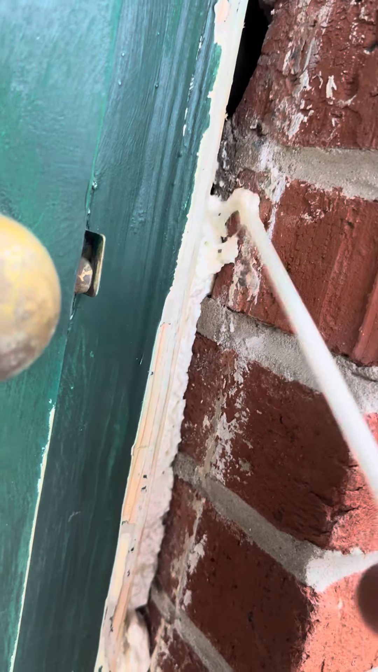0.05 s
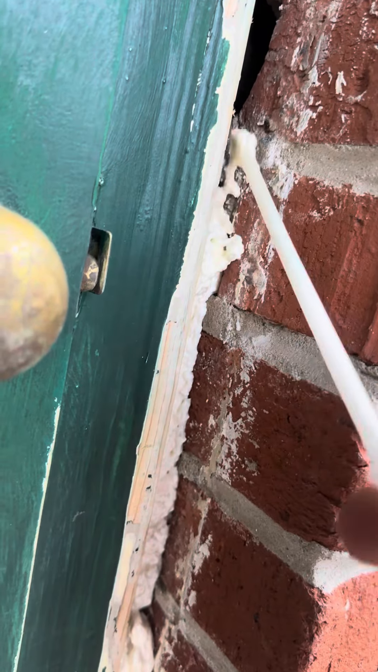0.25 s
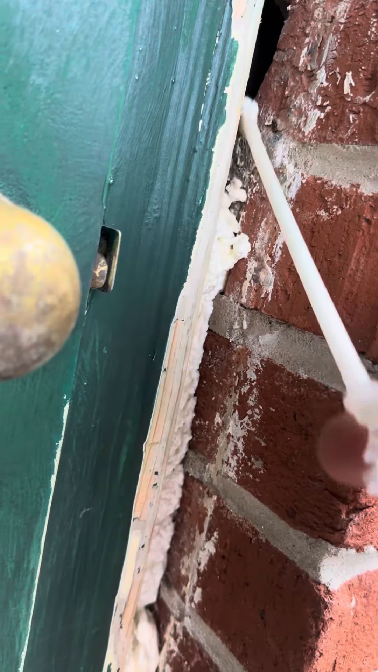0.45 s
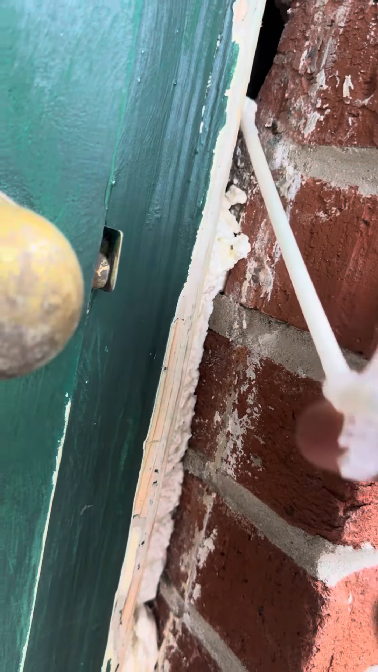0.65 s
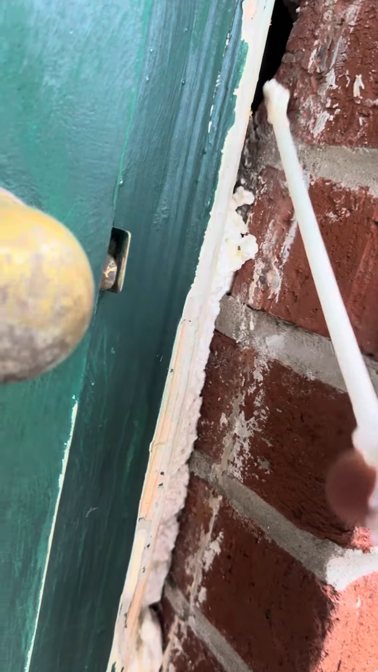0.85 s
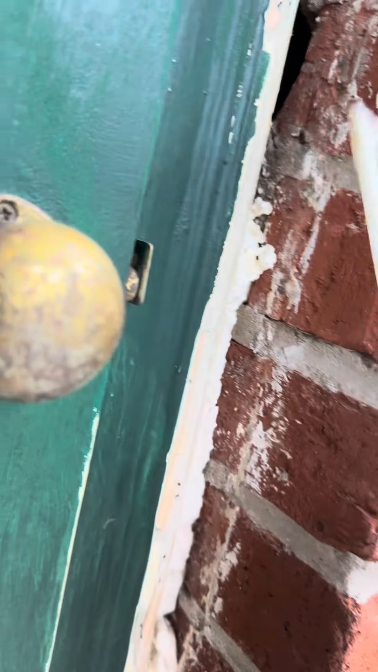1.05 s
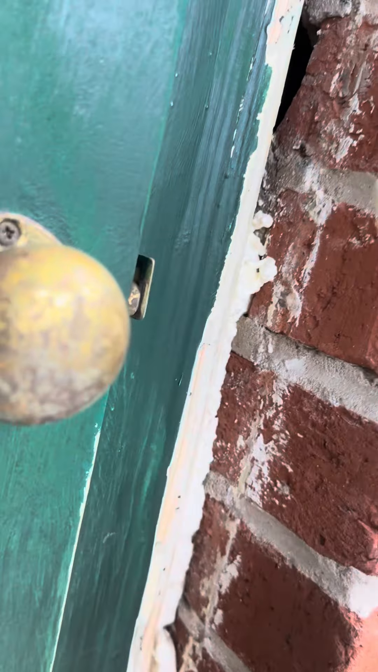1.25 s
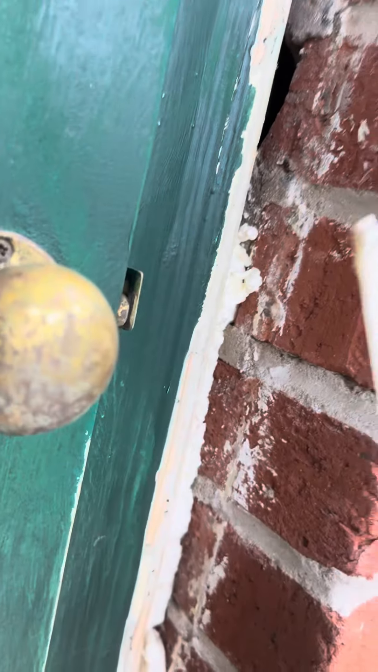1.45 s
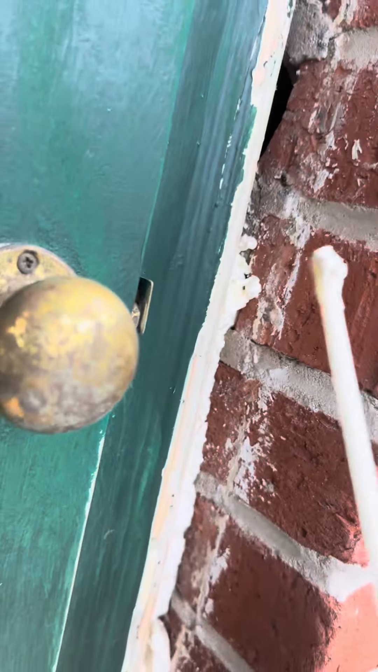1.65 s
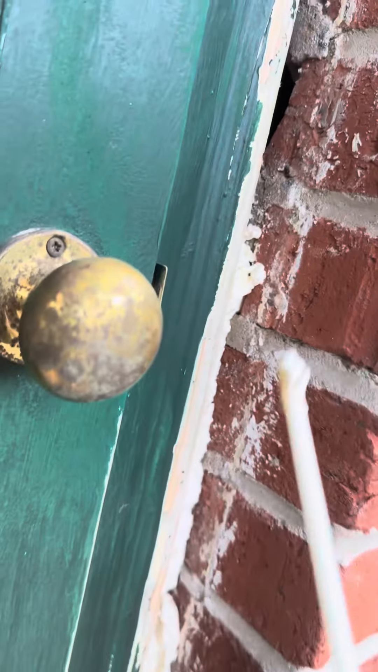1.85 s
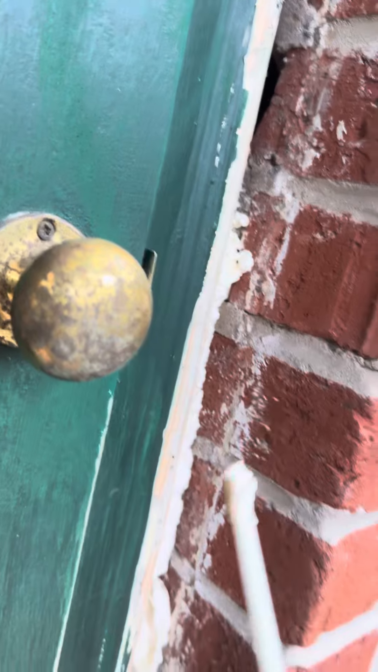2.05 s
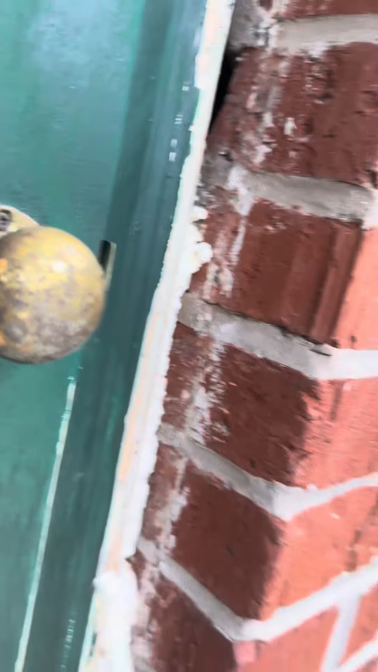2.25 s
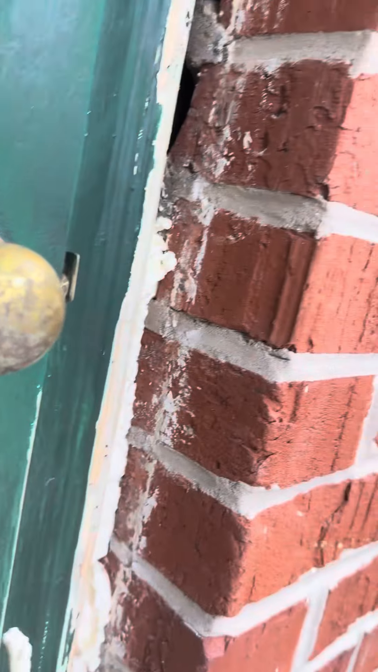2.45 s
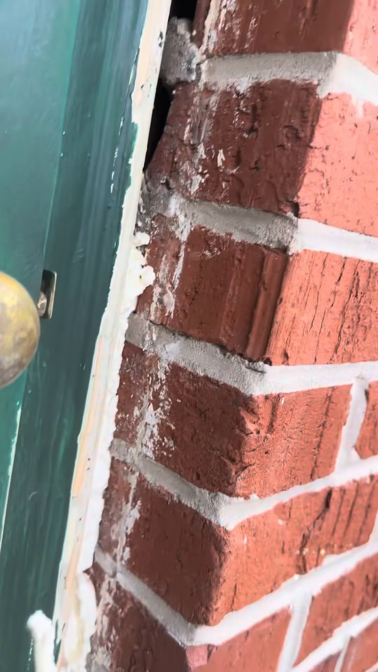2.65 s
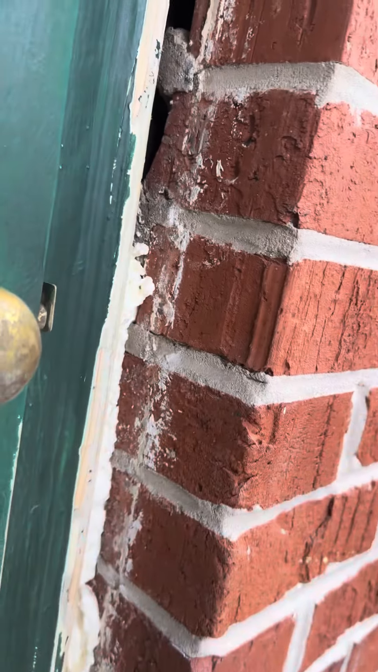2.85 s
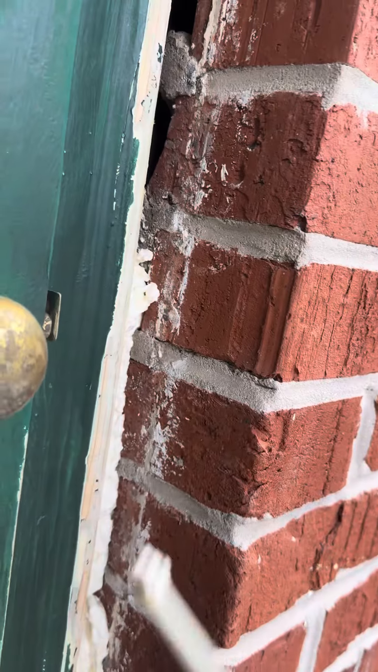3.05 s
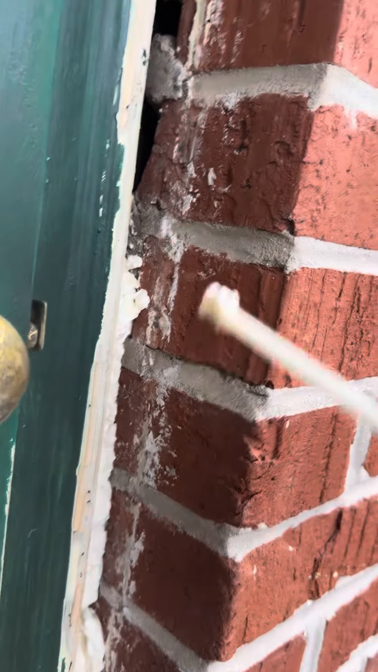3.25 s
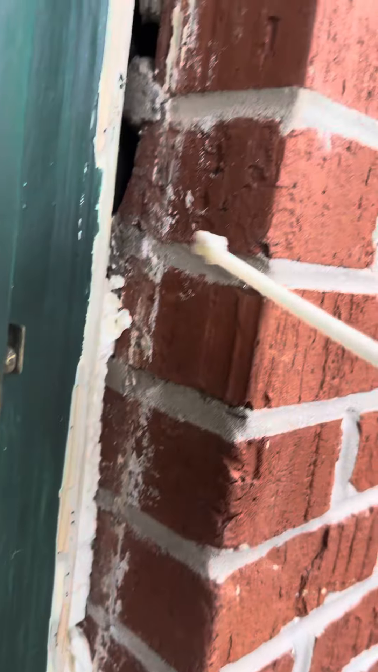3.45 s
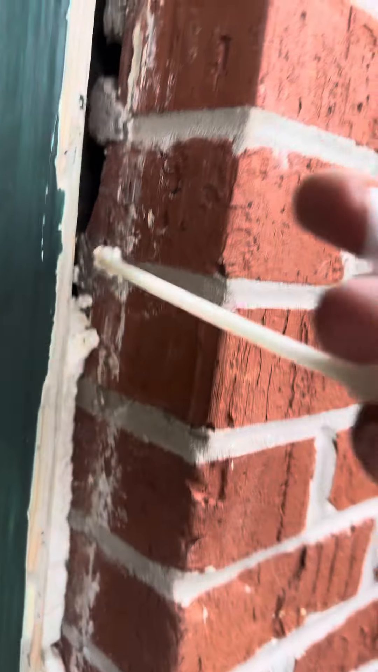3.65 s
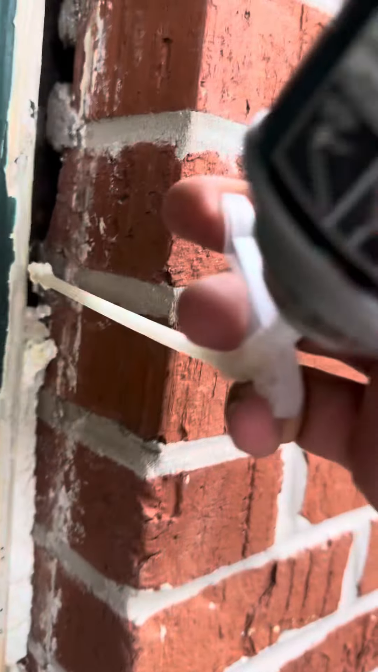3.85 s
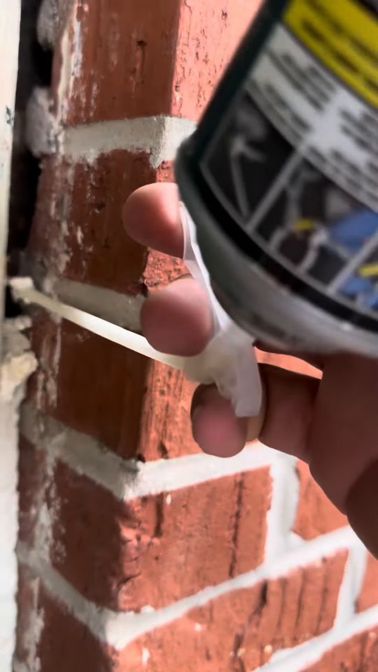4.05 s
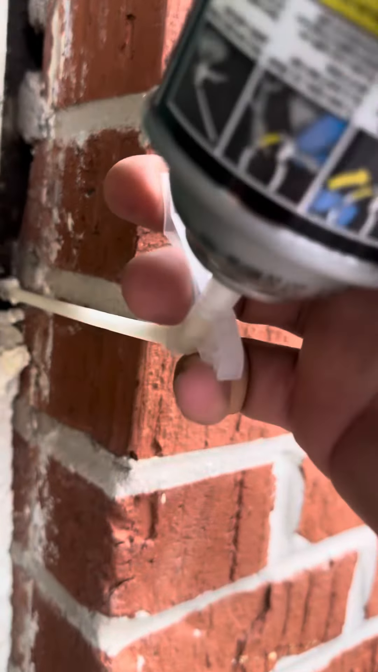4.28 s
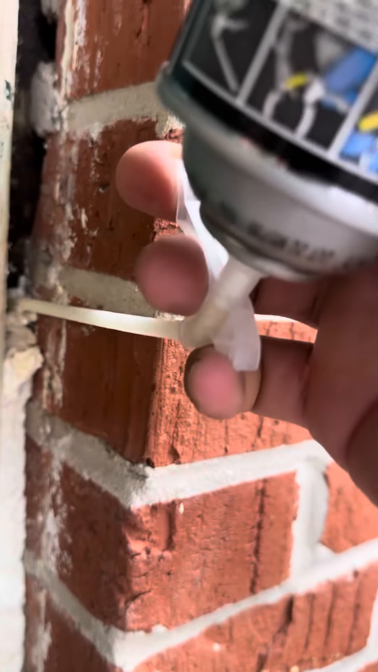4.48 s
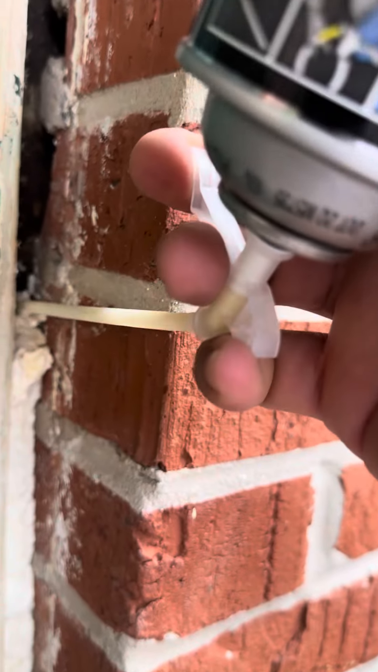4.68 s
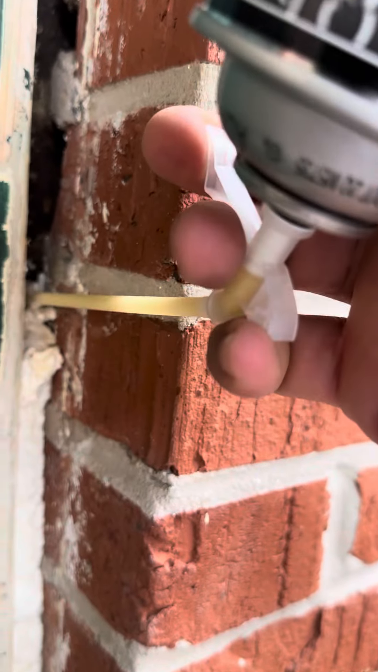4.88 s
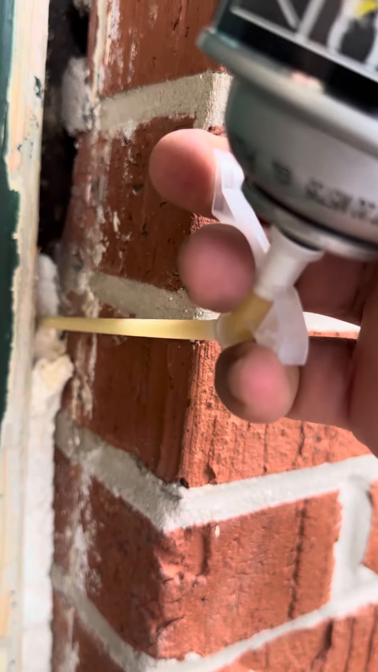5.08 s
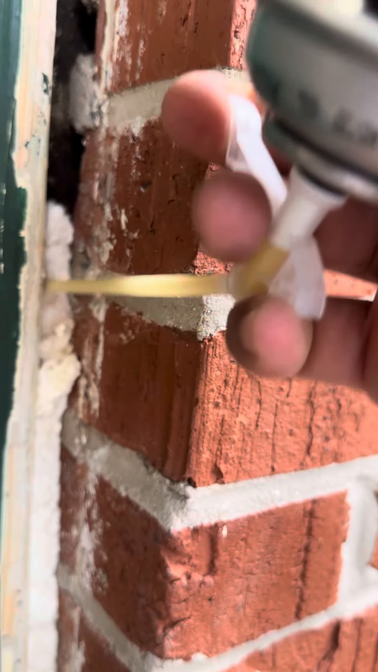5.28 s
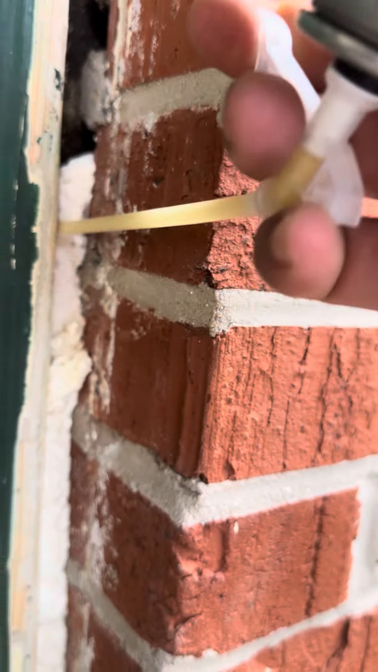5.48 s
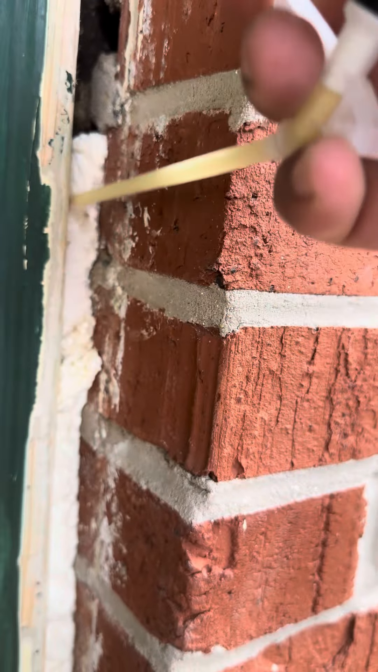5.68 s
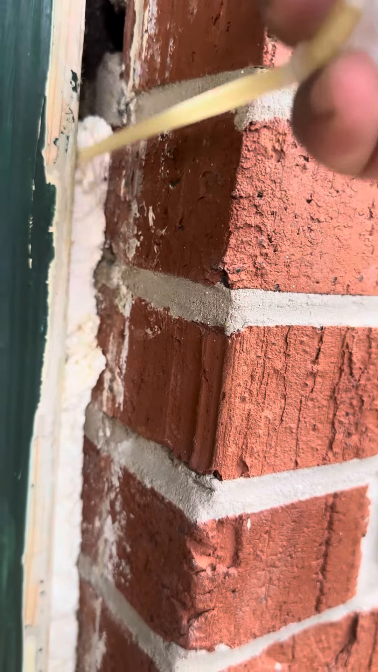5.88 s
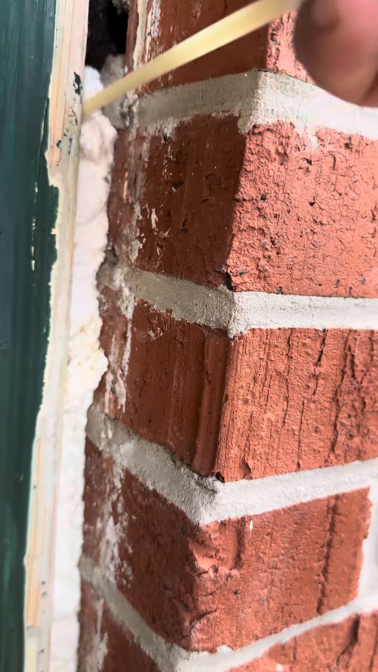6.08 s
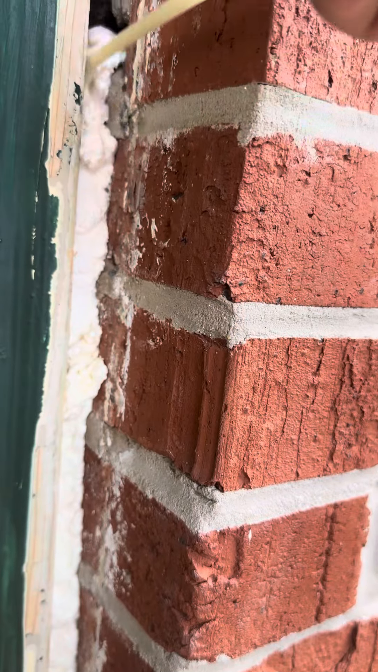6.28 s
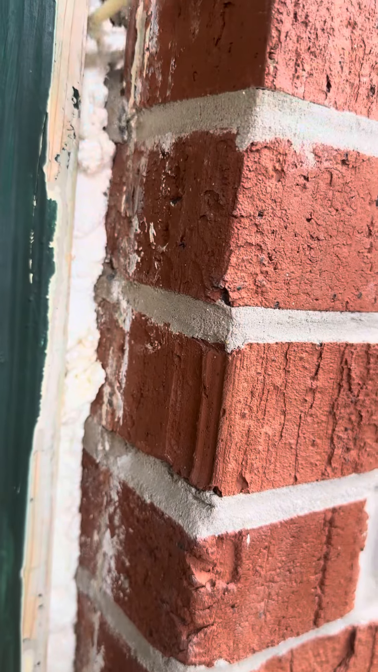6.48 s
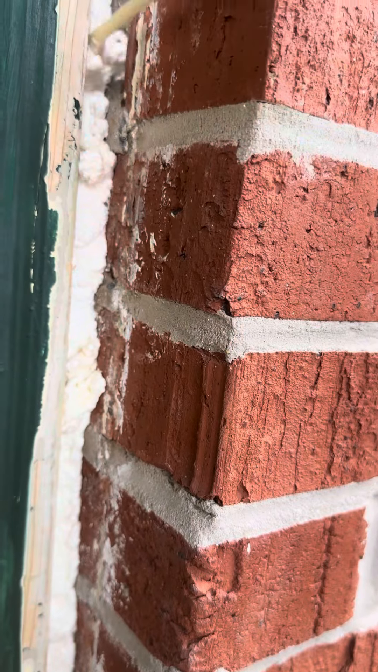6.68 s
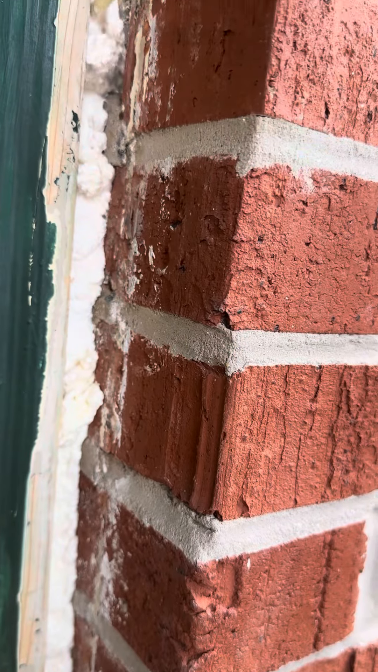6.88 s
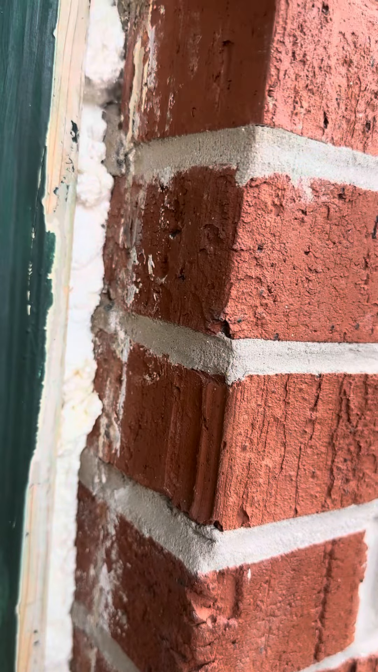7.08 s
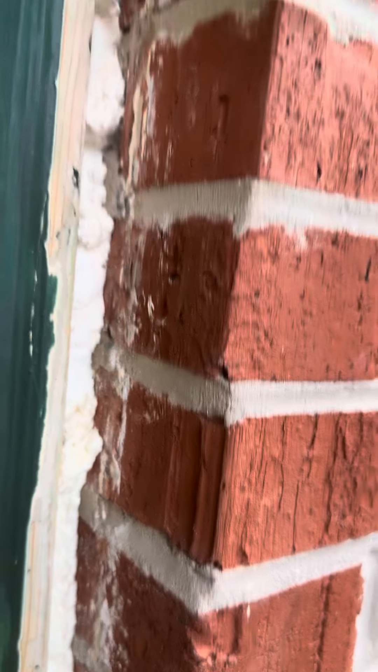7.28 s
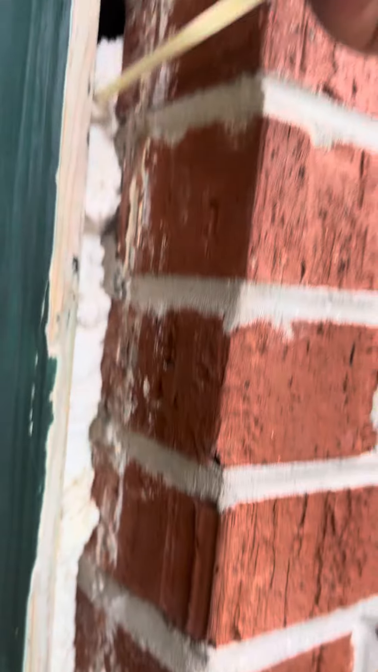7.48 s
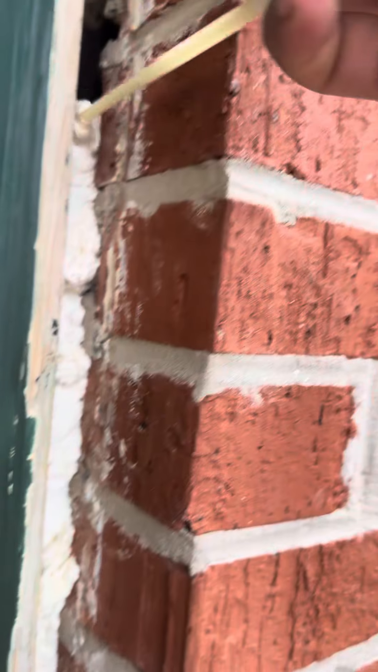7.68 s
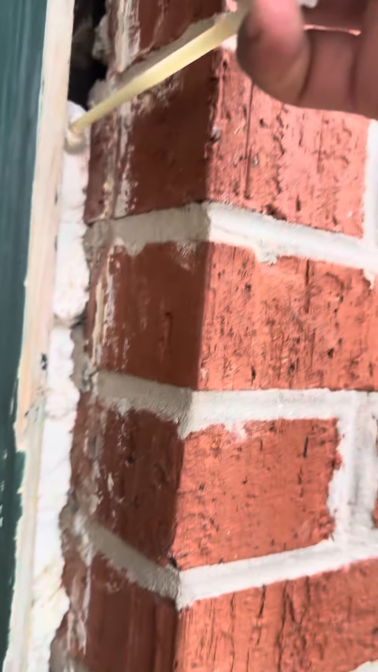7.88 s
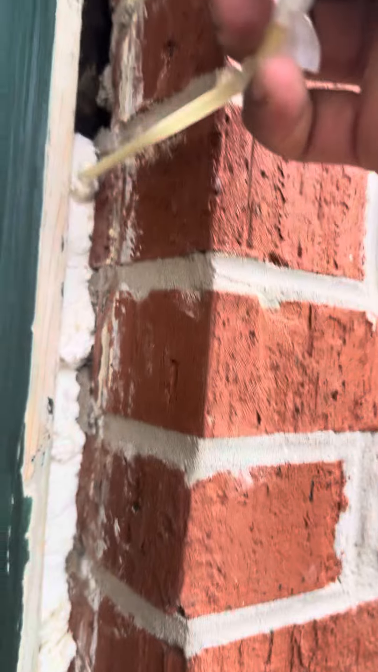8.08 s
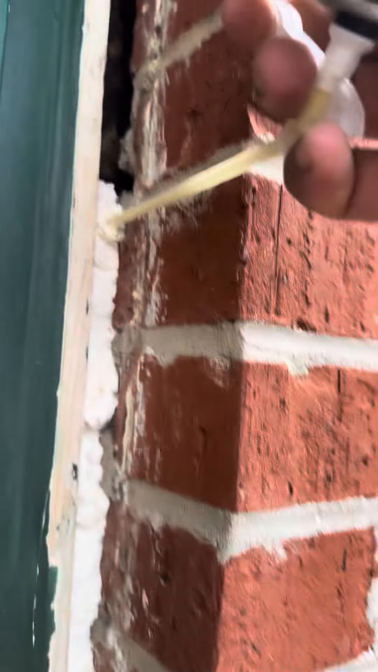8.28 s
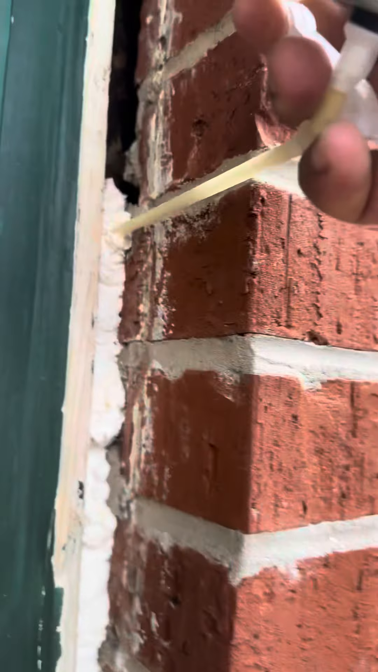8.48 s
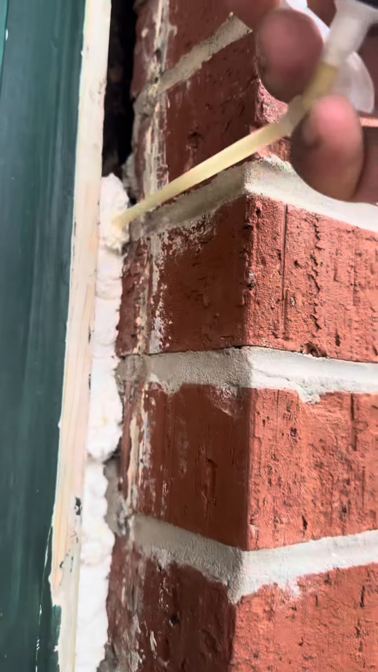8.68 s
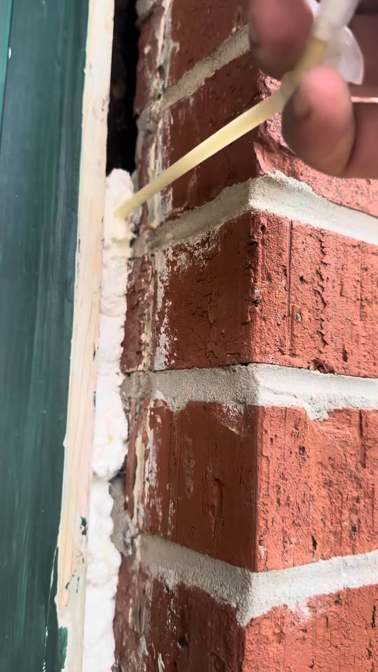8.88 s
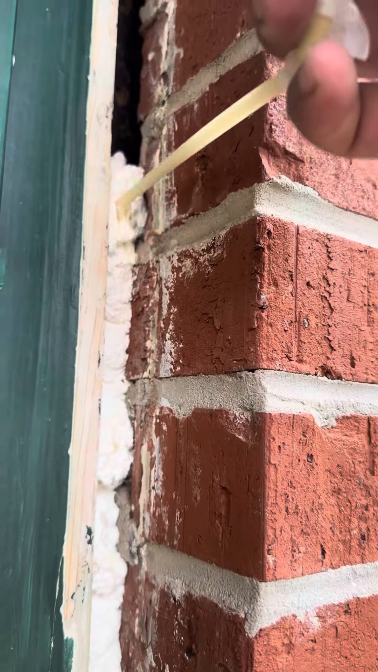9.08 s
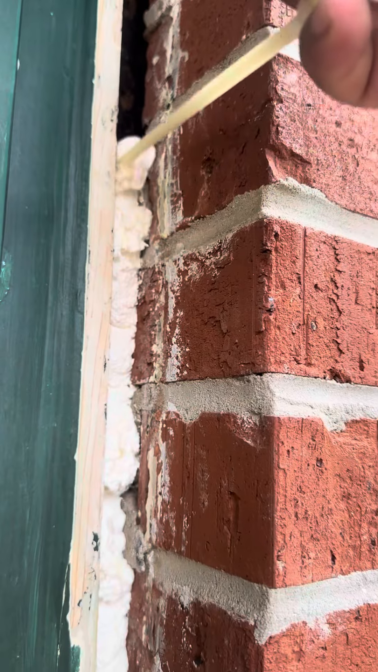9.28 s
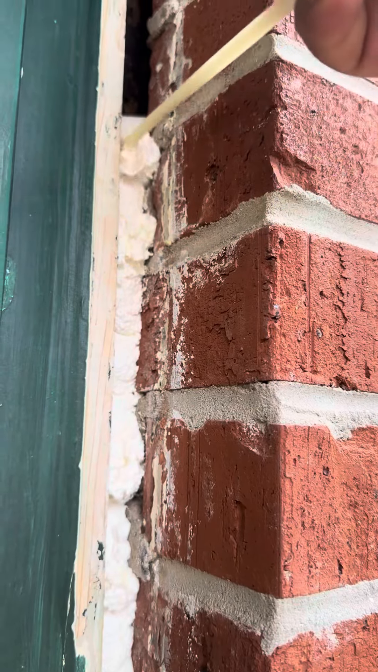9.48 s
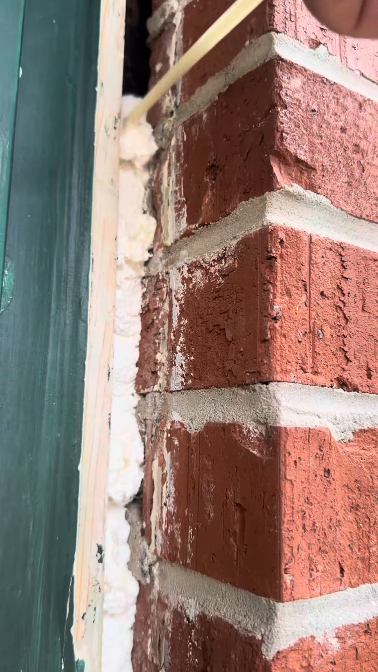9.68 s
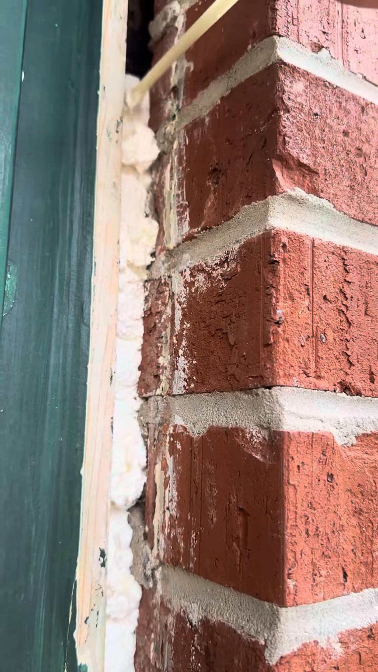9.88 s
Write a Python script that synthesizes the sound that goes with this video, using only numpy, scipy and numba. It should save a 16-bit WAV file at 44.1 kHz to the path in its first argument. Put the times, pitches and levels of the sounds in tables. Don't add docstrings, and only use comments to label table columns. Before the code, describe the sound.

Outdoors, a can is handled quietly, then expanding foam sputters through a thin straw in a loud, uneven, fizzing hiss.

```python
import sys
import numpy as np
from scipy import signal
from scipy.fft import rfft, irfft, next_fast_len
from scipy.io import wavfile
from scipy.ndimage import uniform_filter1d, map_coordinates
from numba import njit

SR = 44100
rng = np.random.default_rng(int(sys.argv[2]) if len(sys.argv) > 2 else 0)


def pcm_store(signal):
    levels = np.round(np.clip(np.atleast_2d(signal), -1, 1) * 32767)
    wavfile.write(sys.argv[1], SR, levels.astype(np.int16).T)


def decibels_to_gain(level_db):
    exponent = np.asarray(level_db, float) / 20
    return 10 ** exponent


N = 438354


def unit(x):
    return x / np.sqrt(np.mean(x ** 2))


def curves(table):
    s, *columns = np.transpose(table)
    return [np.interp(np.arange(N) / SR, s, c) for c in columns]


def on_bins(table):
    hz, value = np.transpose(table)
    bins_hz = np.fft.rfftfreq(next_fast_len(N), 1 / SR)
    return np.interp(np.log(bins_hz + 1), np.log(hz), value)


def shape(x, response):
    size = next_fast_len(N)
    return irfft(rfft(x, size) * response, size)[..., :N]


def band(x, low_hz, high_hz):
    return signal.sosfilt(signal.butter(1, (low_hz, high_hz), "band", fs=SR, output="sos"), x)


@njit
def svf(x, hz, width):
    y, b, l = np.empty(len(x)), 0., 0.
    for i in range(len(x)):
        g, k = np.tan(np.pi * hz[i] / SR), width / hz[i]
        v = (b + g * (x[i] - l)) / (1 + g * (g + k))
        b, l, y[i] = 2 * v - b, l + 2 * g * v, k * v
    return y


def ring(x, hz, width_hz):
    hz = hz + np.zeros(N)
    return unit(svf(svf(x, hz, 1. * width_hz), hz, 1. * width_hz))


def walk(rate):
    k = int(SR / rate)
    steps = np.repeat(rng.standard_normal(N // k + 1), k)
    return unit(uniform_filter1d(uniform_filter1d(steps, k), k)[:N])


def pops(per_s, scatter_db, hiss):
    when = rng.random(N) < per_s / SR
    size = np.minimum(rng.exponential(size=N), 4)
    clicks = when * rng.standard_normal(N) * decibels_to_gain(scatter_db * size)
    return unit(unit(clicks) + hiss * rng.standard_normal(N))


def gate(t0, t1, fade):
    t = np.arange(N) / SR
    return np.clip(np.minimum(t - t0, t1 - t) / fade, 0, 1)


def swell(at, length):
    return np.cos(np.pi * np.clip((np.arange(N) / SR - at) / length, -.5, .5))


def machine():
    # (crest time [s], length [s], crest
    # level [dB], pitch [Hz])
    hum_swells = [(0.402, 0.97, -43.5, 132.6), (0.854, 0.09, -45, 129.1), (1.075, 0.32, -49, 132.1),
                  (1.67, 0.64, -40, 131.4), (2.27, 0.69, -38.5, 133), (2.922, 0.86, -38.5, 131.8),
                  (3.722, 1.23, -35, 130.7), (4.97, 1.01, -32.5, 129.5), (6.223, 0.95, -32.5, 129.3),
                  (6.883, 0.13, -42.5, 132), (6.996, 0.071, -34, 133), (7.474, 1.19, -38, 132.2),
                  (8.232, 0.28, -45, 129.8), (8.695, 0.97, -40, 131), (9.504, 0.83, -48, 131.7),
                  (9.864, 0.64, -45.5, 132.3)]
    hz = curves([(s, f) for s, _, _, f in hum_swells])[0]
    size = decibels_to_gain(-62)
    for s, length, db, _ in hum_swells:
        size = size + decibels_to_gain(db) * np.abs(swell(s, length)) ** 1.5
    phase = 2 * np.pi * np.cumsum(hz) / SR
    hum = np.sqrt(2) * size * (np.sin(phase) + decibels_to_gain(-21) * np.sin(2 * phase))
    drone = decibels_to_gain(-49.0) * ring(rng.standard_normal(N), 57.0, 22)
    drone += decibels_to_gain(-46.0) * ring(rng.standard_normal(N), 76, 37)
    drone += decibels_to_gain(-60) * ring(rng.standard_normal(N), 170.8, 13)
    return hum + drone


def outdoor_rumble():
    # (frequency [Hz], level per Hz [dB])
    air = [(15, -46.5), (25, -10), (134, -4.5), (156, -12.5), (186, -15), (251, -13.5), (356, -23.5),
           (447, -19), (574, -24.5), (2460, -40.5), (2780, -46), (5910, -50.5), (9280, -68.5),
           (10000, -78.5), (13000, -109), (22000, -120)]
    # (frequency [Hz], level per Hz [dB])
    wide = [(40, -8.5), (100, -18), (282, -4), (702, -0.5), (1220, -6), (1900, -23.5), (2500, -19.5),
            (4930, -24.5), (13600, -47.5), (15800, -36.5)]
    middle_db, side_db = -50.5, -62.5
    middle = decibels_to_gain(middle_db + 5.5) * unit(shape(rng.standard_normal(N), decibels_to_gain(on_bins(air))))
    middle = middle * decibels_to_gain(0.36 * walk(4.1))
    side = decibels_to_gain(side_db) * unit(shape(rng.standard_normal(N), decibels_to_gain(on_bins(wide))))
    return middle + side * np.array([[1], [-1]])


def ticks():
    # (time [s], peak level [dB], ring pitch [Hz], crisp part [dB])
    can_ticks = [(0.015, -53, 2500, -18), (0.0488, -50, 2250, -16), (0.066, -42.5, 1200, -12),
                 (0.3096, -52, 2260, -20), (0.375, -48, 1280, -8), (0.402, -39.5, 2180, -14.5),
                 (0.602, -56, 1290, -19), (0.6494, -55, 1190, -15), (0.8175, -54, 1420, -11),
                 (1.048, -47, 1240, -20), (1.1504, -53, 1180, -2.5), (1.3917, -46, 1980, -22),
                 (1.6023, -50, 1310, -8), (1.839, -54.5, 1960, 3), (2.0083, -55, 1690, 5),
                 (2.355, -59, 1520, -15), (2.4244, -52, 1140, -17), (2.455, -50, 1370, -21),
                 (2.6394, -61, 1240, -1), (2.6584, -36, 2040, -14.5), (3.084, -55, 1330, -19),
                 (3.1393, -50.5, 1210, -16), (3.334, -51, 1584, -20), (4.1994, -51.5, 1450, -21),
                 (4.3358, -53, 1830, -17.5), (4.373, -51.5, 2700, -22.5), (0.1087, -50, 2230, -10),
                 (0.2793, -59, 2500, -4), (0.6864, -56, 3000, -6), (1.2063, -59, 2500, 6),
                 (1.258, -56, 2530, -1), (1.365, -55.5, 2000, -7.5), (1.8761, -50, 1499, -18),
                 (2.143, -57, 1500, -20), (4.418, -50.5, 2600, -10), (4.4405, -49, 2660, -10)]
    # (time [s], peak level [dB], ring pitch [Hz], crisp part [dB])
    first_bursts = [(4.485, -42, 2680, -22.5), (4.595, -40, 860, -23.5), (4.61, -37.5, 1060, -25),
                    (4.638, -42.5, 1790, -21), (4.655, -37, 990, -27), (4.736, -37, 1550, -27),
                    (4.765, -37, 900, -25), (4.785, -37.5, 1500, -19.5), (4.805, -28, 1060, 0),
                    (4.8276, -24, 1890, -1), (4.834, -17, 2240, -2.5)]
    events = can_ticks + first_bursts
    out = np.zeros(N)
    lag = np.arange(900) / SR
    noise = rng.standard_normal((len(events), 2, len(lag)))
    dull = band(noise[:, 0] * np.exp(-lag / 0.0016) * np.tanh(lag / 0.00034), 600, 5500)
    treble = signal.butter(2, 6000, "high", fs=SR, output="sos")
    crisp = signal.sosfilt(treble, noise[:, 1] * np.exp(-lag / 0.0024))
    trigger = decibels_to_gain(-9.5) * np.sin(2 * np.pi * 1060 * lag) * np.exp(-lag / 0.0053)
    for (s, peak_db, hz, crisp_db), a, b in zip(events, dull, crisp):
        tone = np.sin(2 * np.pi * hz * lag) * np.exp(-lag / .0025) + trigger
        tick = decibels_to_gain(3.5) * a + decibels_to_gain(crisp_db + 4.5) * b + decibels_to_gain(-2.5) * tone
        start = int(s * SR)
        out[start:start + len(lag)] += decibels_to_gain(peak_db) * tick
    return out


def rustle():
    # (time [s], peak level [dB], fade [dB per s])
    flurries = [(.07, -64, 500.5), (.11, -67, 250), (.28, -76, 180), (.41, -72.5, 500), (.69, -78, 100),
                (.85, -79.5, 120), (1.01, -72, 130), (1.24, -67, 170), (1.4, -65.5, 450),
                (1.61, -70.5, 130), (1.85, -72.5, 140), (2.02, -70, 188), (2.28, -69, 294), (2.36, -68, 80),
                (1.91, -73, 150), (1.15, -71.5, 100), (.14, -70.5, 200), (.6, -80.5, 100), (2.69, -64, 300),
                (2.66, -60.5, 260), (2.82, -75, 130), (2.94, -79.5, 26), (3.15, -76, 120), (3.35, -80, 302),
                (3.62, -74.5, 200), (3.73, -78, 34), (3.84, -75, 52), (3.98, -71.5, 32), (4.35, -67, 698)]
    # (frequency [Hz], level [dB])
    cloth = [(500, 8.5), (1500, 9.5), (4000, -3), (7500, 3), (10000, -8), (13000, -20), (15500, -7.5)]
    rise_db_s, rest_db = 344, -91
    t = np.arange(N) / SR
    each = [db - np.where(t < s, rise_db_s * (s - t), fade * (t - s)) for s, db, fade in flurries]
    level_db = np.maximum(np.max(each, axis=0), rest_db)
    crackle = decibels_to_gain(level_db + 7) * pops(per_s=1500, scatter_db=3.5, hiss=0.9) * gate(-1., 4.43, .02)
    return shape(crackle, decibels_to_gain(on_bins(cloth)))


def taps():
    # (time [s], peak level [dB], pitch [Hz])
    knocks = [
        (.07, -52, 1140),
        (1.747, -45, 1240),
        (2.4, -47, 1312),
        (2.664, -50, 1060),
        (2.693, -53, 2050),
    ]
    out, t = np.zeros(N), np.arange(N) / SR
    for s, db, hz in knocks:
        fade_s = np.where(t < s, .001, 0.0057)
        out += decibels_to_gain(db) * np.sin(2 * np.pi * hz * (t - s)) * np.exp(-np.abs(t - s) / fade_s)
    return out


def valve():
    # (time [s], hiss level [dB], wet cells against the hiss [dB])
    gas = [
        (4.4, -80, 9),
        (4.432, -47, -15),
        (4.447, -44, -28),
        (4.49, -37.5, -21),
        (4.51, -35, -26),
        (4.565, -38, -24),
        (4.6, -38.5, -8.5),
        (4.79, -45.5, 1.5),
    ]
    # (frequency [Hz], level [dB])
    jet = [(1500, -13.5), (2400, 1.5), (2600, 0.5), (5000, -1), (7800, 8), (9300, 2), (12500, -12),
           (13800, 10), (16000, 2)]
    hiss_db, wet_db = curves(gas)
    hiss = unit(shape(rng.standard_normal(N) * decibels_to_gain(0.57 * walk(40)), decibels_to_gain(on_bins(jet))))
    wet = ring(pops(per_s=900, scatter_db=1.5, hiss=1.1), 1100, 1600)
    return decibels_to_gain(hiss_db) * (hiss + decibels_to_gain(wet_db) * wet) * gate(4.4, 4.85, 0.013)


def controls():
    # (time [s], flow [dB], gap pitch [Hz], upper pitch [Hz], gap left open [dB])
    flow = [(4.78, -52, 1383, 2140, -6), (4.82, -33, 1450, 2060, 0.5), (4.88, -24.5, 1390, 2290, 5.5),
            (4.97, -20.5, 1480, 2140, 2.5), (5.05, -25, 1310, 1820, 2.5), (5.12, -26.5, 1260, 1910, -7.5),
            (5.38, -25.5, 1286, 1925, -2), (5.62, -29.5, 996, 2020, -7.5), (5.96, -30.5, 1200, 1830, -2),
            (6.22, -25.5, 1455, 1960, -11.5), (6.5, -28.5, 1350, 2040, -0.5), (6.9, -29, 1110, 1960, -4.5),
            (7.05, -29, 1290, 2320, -2.5), (7.45, -28, 1180, 2270, -10), (7.93, -28.5, 1305, 2000, -4),
            (8.52, -33, 1186, 1830, -11.5), (8.88, -24.5, 1224, 1970, -5), (9.94, -26, 1214, 1896, -8.5)]
    # (time [s], foam cover over the tip [dB], tip cavity pitch [Hz])
    straw_tip = [(4.78, -3, 3980), (4.86, -0.5, 4320), (4.97, -14.5, 3500), (5.24, -14.5, 4240),
                 (5.58, -17.5, 3890), (5.96, -11.5, 3460), (6.22, -15, 4090), (6.42, -7, 3680),
                 (6.69, -7, 3690), (6.79, -26.5, 3180), (6.9, -19, 4080), (7.03, -5, 3550),
                 (7.9, -11.5, 3760), (8.05, -14.5, 3420), (8.5, -27, 3430), (8.96, -35.5, 3900),
                 (9.3, -23, 3870), (9.94, -12.5, 3800)]
    # (time [s], length [s], level change [dB])
    lumps = [(4.856, 0.048, 2.5), (5.12, .04, 0.5), (5.23, 0.06, -6), (5.39, 0.1, 6), (5.843, 0.043, -2.5),
             (6.1, 0.027, -2), (6.335, 0.027, -0.5), (6.419, .03, -2), (6.601, .05, -1.5),
             (6.671, 0.043, 8), (6.986, .015, 5.5), (7.243, 0.056, 3.5), (7.4, 0.052, -3.5),
             (7.421, 0.01, 7.5), (7.498, 0.05, -6.5), (7.535, 0.013, 0.5), (7.635, 0.016, 5.5),
             (7.817, 0.14, 4.5), (7.99, .03, 2), (8.1, 0.061, -4.5), (8.16, 0.031, 3.5), (8.28, .04, -0.5),
             (8.64, 0.077, 6), (9.245, 0.035, 1), (9.524, 0.07, 5), (9.618, 0.04, 2.5), (9.785, 0.032, 5),
             (9.858, 0.024, -4)]
    flow_db, gap_hz, up_hz, mouth_db = curves(flow)
    cover_db, tip_hz = curves(straw_tip)
    lump_db = sum(db * swell(s, 2 * length) ** 2 for s, length, db in lumps)
    gap_hz = gap_hz * (1 + 0.042 * walk(12))
    up_hz = up_hz * (1 + 0.06 * walk(8))
    tip_hz = tip_hz * (1 + 0.046 * walk(10))
    up_db = flow_db + mouth_db + 0.43 * lump_db
    tip_db = flow_db + 1.5 + 0.68 * cover_db + 0.81 * lump_db
    open_db = flow_db + cover_db + lump_db
    return flow_db, gap_hz, up_db, up_hz, tip_db, tip_hz, open_db


def froth(cells):
    pockets = 0
    for hz in np.geomspace(800, 8000, num=14):
        pockets = pockets + svf(cells, np.full(N, hz), .16 * hz) * decibels_to_gain(4.5 * walk(18))
    return unit(cells + decibels_to_gain(-10.5) * unit(pockets))


def spurts(rate, sag_s):
    kicks = (rng.random(N) < rate / SR) * rng.exponential(size=N)
    sagging = signal.lfilter([1], [1, -np.exp(-1 / (sag_s * SR))], kicks)
    push = uniform_filter1d(sagging, int(0.0036 * SR))
    push = push - uniform_filter1d(push, int(.11 * SR))
    return unit(np.tanh(0.55 * unit(push)))


def hollows(cells):
    # (time [s], length [s], pitch [Hz], level [dB])
    cavities = [(4.89, 0.094, 3900, -21), (4.92, 0.18, 2400, -23), (9.6, 0.29, 2160, -33.5),
                (5.04, 0.36, 5200, -33), (5.15, 0.15, 3500, -40.5), (5.19, 0.59, 2690, -37.5),
                (5.39, 0.056, 5460, -29), (5.262, .25, 4400, -37), (5.33, 0.62, 1485, -30.5),
                (5.729, 0.29, 2100, -27), (6.08, 0.52, 1740, -28.5), (6.292, 0.14, 3180, -31.5),
                (6.724, 0.24, 3060, -26), (6.726, 0.2, 3710, -29), (7.5, 0.35, 2930, -39.5),
                (7.127, 0.4, 3840, -31.5), (7.25, 0.069, 3730, -24), (7.85, 0.24, 2180, -32),
                (8.32, .06, 4400, -42), (8.95, 0.48, 1970, -28.5), (8.93, 0.16, 3920, -42),
                (9.36, 0.28, 4430, -36), (9.684, 0.081, 4570, -31), (9.86, 0.14, 4040, -36.5),
                (7.13, 0.27, 3080, -38), (8.87, 0.45, 2570, -38.5), (9.93, 0.45, 2070, -32),
                (7.39, 0.34, 3600, -38), (5.602, 0.25, 3160, -40.5), (6.05, 0.23, 3300, -40),
                (8.42, 0.62, 2520, -49.5), (9.5, 0.16, 4850, -36.5), (9.83, .2, 4600, -43),
                (9.68, 0.091, 6300, -34), (9.25, .08, 6600, -41), (9.9, 0.11, 6360, -39.5),
                (6.3, .06, 6500, -33), (6.47, 0.065, 6040, -33), (6.48, 0.13, 6600, -38),
                (6.58, 0.045, 6640, -35.5), (7.05, 0.06, 5670, -29.5), (7.08, 0.057, 6500, -37),
                (6.8, .25, 3400, -39.5), (7.84, 0.083, 3900, -34), (8.0, 0.11, 3600, -35.5),
                (5.39, 0.12, 3900, -32.5), (4.93, 0.15, 3400, -33), (8.67, 0.074, 5000, -49),
                (8.2, 0.12, 4200, -43), (4.844, 0.045, 4300, -37), (5.7, .1, 6200, -44),
                (8.6, .1, 7300, -38)]
    width = 0.16
    return sum(decibels_to_gain(db) * swell(s, length) * ring(cells, hz, width * hz) for s, length, hz, db in cavities)


def foam():
    # (frequency [Hz], level [dB])
    colour = [(150, 7), (300, 6.5), (700, -0.5), (2600, 1), (3100, -2.5), (3700, -4), (7500, -2),
              (9000, -3), (12000, -5), (14300, 2), (16000, 13.5)]
    low_db, low_hz, up_db, up_hz, tip_db, tip_hz, open_db = controls()
    deep = froth(pops(per_s=6000, scatter_db=2., hiss=1.) * decibels_to_gain(0.48 * walk(60)))
    surface = froth(pops(per_s=5000, scatter_db=4.5, hiss=0.87) * decibels_to_gain(1.02 * walk(60)))
    spurt = spurts(rate=30, sag_s=0.0068)

    gap = unit(ring(deep, low_hz, 736) + decibels_to_gain(-5.0) * ring(deep, 1048, 480))
    low = decibels_to_gain(low_db + 0.24 * spurt) * gap

    broad = ring(ring(deep, up_hz, 1600), up_hz, 1600)
    upper = unit(broad + decibels_to_gain(-15.5) * ring(deep, up_hz, 520))
    upper = decibels_to_gain(up_db + 0.69 * spurt + 0.45 * walk(33)) * upper

    straw = unit(ring(deep, 614.0, 353) + decibels_to_gain(-8.5) * ring(surface, 324, 415))
    straw = decibels_to_gain(-35.5 + 0.1 * (low_db + 28.0)) * straw

    whistle = decibels_to_gain(-8 + .4 * (tip_db - open_db - 8)) * ring(surface, tip_hz, 420)
    tip = unit(ring(surface, tip_hz, 2630) + whistle)
    tip = decibels_to_gain(tip_db + 1.17 * spurt + 1.47 * walk(45)) * tip

    spray_db = open_db + 0.7 * spurt + 0.91 * spurts(rate=20, sag_s=.01) + 2.0 * walk(55)
    spray = decibels_to_gain(spray_db) * ring(ring(surface, 7300, 8400), 7050, 9000)

    grows_db_s = 2.5
    leak_db = -49.5 + grows_db_s * (np.arange(N) / SR - 8.0) + 0.04 * (open_db + 29.0) + 1.2 * walk(3)
    leak = decibels_to_gain(leak_db) * ring(rng.standard_normal(N), 9500, 9000)

    singing = hollows(pops(per_s=4000, scatter_db=4.5, hiss=.8))
    whole = low - upper - straw + tip - spray + leak + singing
    return shape(whole * gate(4.77, 11., 0.052), decibels_to_gain(on_bins(colour)))


def bump():
    # (time [s], pitch [Hz], length [s], level [dB])
    knock = (6.998, 100, .008, -20)
    s, hz, length_s, db = knock
    t = np.arange(N) / SR - s
    return -decibels_to_gain(db) * np.cos(2 * np.pi * hz * t) * np.exp(-(t / length_s) ** 2)


def corner(x):
    ripple_hz, echo_db = 517, -12.5
    late = np.arange(N) - SR / ripple_hz * (1 + 0.049 * walk(2.5))
    return x + decibels_to_gain(echo_db) * uniform_filter1d(map_coordinates(x, [late], order=1), size=3)


def wall_echoes(near):
    # (frequency [Hz], level [dB])
    walls = [(200, -38), (430, -24), (800, -15), (1200, -18), (2000, -24), (3300, -14), (4500, -23),
             (6000, -15), (9000, -7)]
    lag = np.arange(2000) / SR
    tail = rng.standard_normal(len(lag)) * np.exp(-lag / 0.011)
    scattered = signal.fftconvolve(near, tail / np.linalg.norm(tail))[:N]
    return shape(scattered, decibels_to_gain(on_bins(walls)))


def sideways_lean(near):
    # (time [s], share of the upper band to the left)
    sway = [
        (4.4, .03),
        (5.1, 0.011),
        (5.8, 0.01),
        (6.3, 0.052),
        (7.3, 0.052),
        (8.5, .04),
        (9.9, .04),
    ]
    return decibels_to_gain(-24.5) * band(near, 300, 1300) - curves(sway)[0] * band(near, 900, 4000)


def two_ports(near):
    # (frequency [Hz], phase the left port lags [radians])
    front_lag = [(4800, 0), (6000, .7), (7700, 1.6), (9500, 2.3), (11500, 3.1), (13000, 3.3), (14300, 3.8),
                 (15000, 4.0), (15800, 4.25)]
    # (frequency [Hz], phase the left port lags [radians])
    side_lag = [(4800, 0), (6000, .8), (7700, 1.9), (8800, 2.8), (10000, 3.1), (13000, 3.3), (14300, 3.6),
                (15000, 4.0), (15800, 4.6)]
    # (time [s], share seen from the side)
    angle = [(4.4, .1), (4.85, .1), (4.95, 0.31), (5.25, 0.2), (5.42, 0.67), (6.13, 0.63), (6.2, 0.05),
             (6.55, .1), (6.72, 0.6), (6.9, .1), (7.9, 0.09), (8.3, 0.21), (9.1, 0.21), (9.9, 0.092)]
    turn = np.exp(.5j * on_bins(front_lag))
    wider = np.exp(.5j * on_bins(side_lag))
    aslant = np.clip(curves(angle)[0] + .15 * walk(12), -1, 1.2)
    front = shape(near, np.array([1 / turn, turn]))
    side = shape(near, np.array([1 / wider, wider]))
    return (1 - aslant) * front + aslant * side


def scene():
    near = corner(ticks() + rustle() + taps() + valve() + foam() + bump())
    uneven = wall_echoes(near) - sideways_lean(near)
    return two_ports(near) + uneven * np.array([[1], [-1]]) + machine() + outdoor_rumble()


def band_limit(x):
    return signal.sosfilt(signal.butter(12, 16780, fs=SR, output="sos"), x)


def record(dry):
    # (frequency [Hz], level [dB])
    case = [(2100, -1), (2550, 2), (2850, 2), (3300, 0), (4500, 2), (5200, 0), (6000, 1), (7500, -1.5),
            (8000, -1)]
    top_hz = 15830
    below_top = np.fft.rfftfreq(next_fast_len(N), 1 / SR) < top_hz
    mix = shape(dry, below_top * decibels_to_gain(on_bins(case)))
    return band_limit(mix)


dry = scene()
out = record(dry)
pcm_store(out)
```